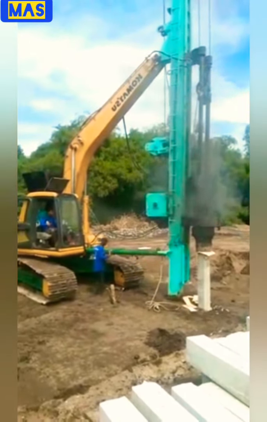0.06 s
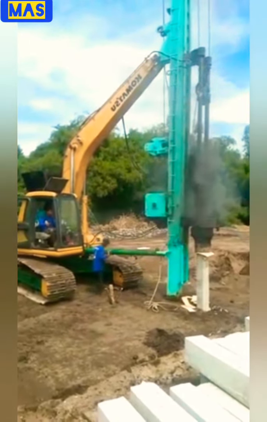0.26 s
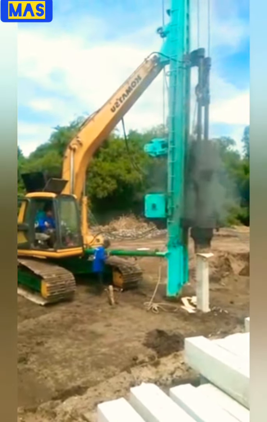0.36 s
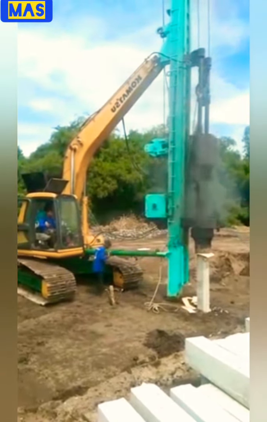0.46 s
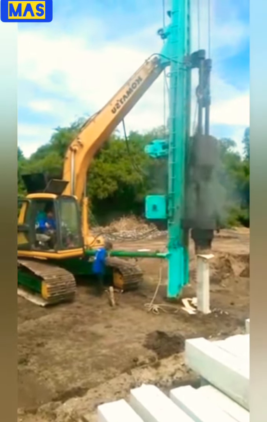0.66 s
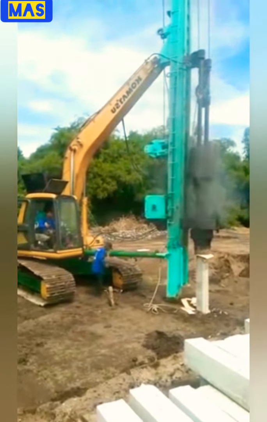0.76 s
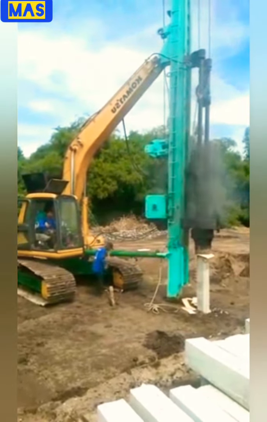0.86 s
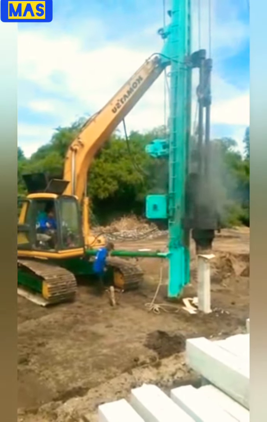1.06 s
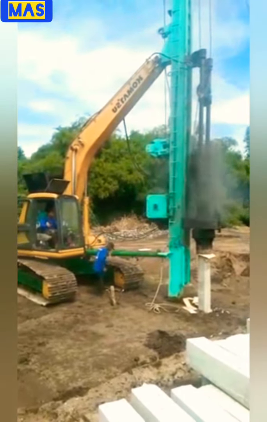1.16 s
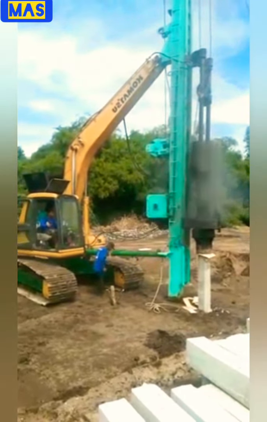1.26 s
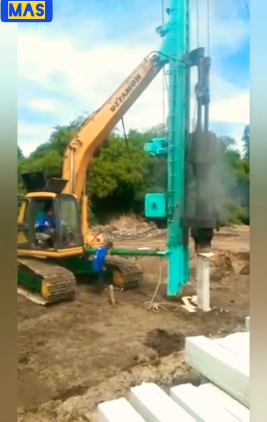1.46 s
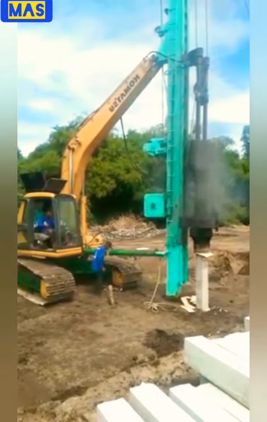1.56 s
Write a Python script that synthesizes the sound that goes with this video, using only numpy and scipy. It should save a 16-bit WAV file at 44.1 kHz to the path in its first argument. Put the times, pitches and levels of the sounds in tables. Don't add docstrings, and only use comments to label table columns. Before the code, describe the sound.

A diesel pile hammer bangs twice, steel clanging, each blow followed by a hissing exhaust boom

```python
import sys
import numpy as np
from scipy import signal
from scipy.fft import rfft, irfft
from scipy.io import wavfile
from scipy.ndimage import uniform_filter1d

SR = 44100
rng = np.random.default_rng(int(sys.argv[2]) if len(sys.argv) > 2 else 0)


def inscribe(sig):
    pcm = np.round(np.clip(np.atleast_2d(sig).T, -1, 1) * 32767)
    wavfile.write(sys.argv[1], SR, pcm.astype(np.int16))


def gain_from_db(level_db):
    decades = np.asarray(level_db, float) / 20
    return 10 ** decades


N = 70560

# start in seconds, level in dB, second tap lag in seconds,
# second tap level in dB.
KNOCK_EVENTS = [
    (0.105, -16.5, 0.018, -13.5),
    (.988, -20.5, 0.014, -14),
]
# frequency in Hz, density in dB per Hz.
KNOCK_SPECTRUM = [(60, -7), (170, 11.5), (600, -3.5), (1600, 5), (2500, 3), (3400, -5.5), (7000, -8.5),
                  (13000, -18)]
# frequency in Hz, level in dB, T60 in seconds.
RAM_RINGS = [(178, -6, .07), (432, -4, .1), (700, -8, .08), (850, -8, .08), (1530, -10, .05),
             (1900, -11, .05)]

# start in seconds, level in dB, trim of the upper rings in dB,
# rise in seconds.
PING_EVENTS = [
    (.2006, -3, 0, .0013),
    (1.0812, -3, -8, .0025),
]
# frequency in Hz, level in dB, T60 in seconds.
ANVIL_RINGS = [(1800, -9, .012), (2400, -11, .08), (4065, 0, .045), (4560, -12, .08), (5100, -13, .04),
               (6100, -13, .035), (7430, -15, .05), (8045, -5, .055), (9950, -22, .05), (12100, -14, .025)]
# frequency in Hz, density in dB per Hz.
CRACK_SPECTRUM = [(300, -17.5), (900, -13.5), (2000, 0.5), (3300, -13.5), (4300, -2.5), (6000, -4),
                  (8100, -7.5), (12000, -8)]
# lag in seconds, level in dB.
PING_ECHOES = [
    (.09, -19),
    (.125, -24),
]
PING_DB = 0.1

# start in seconds, level in dB, treble snap in dB,
# second jolt lag in seconds, jolt level in dB.
BANG_EVENTS = [
    (0.2376, -12.5, 1.5, 0.046, -17),
    (1.1078, -13.5, 9, 0.048, -9),
]
# frequency in Hz, density in dB per Hz.
BANG_SPECTRUM = [(60, -20), (200, -14), (420, -4.5), (570, -22.5), (900, -4), (1300, -15), (2400, -10),
                 (8000, -19.5)]
# frequency in Hz, width in Hz, level in dB.
LEADER_MODES = [(322, 30, -6), (418, 28, -1), (740, 50, -3), (1028, 40, -6), (1405, 45, -8),
                (1955, 50, -11), (2207, 25, 0), (2648, 50, -7), (2812, 25, -6), (4200, 120, -11),
                (4420, 50, -12), (5230, 140, -11), (6410, 45, -10), (7200, 200, -14)]
RING_T60_S, RING_TILT, RING_CLEAN = 0.33, 0.33, 0.55

# start in seconds, hiss level in dB, lag of its return in seconds.
PUFF_EVENTS = [
    (.3515, -4, .0705),
    (1.2248, -5, .0757),
]
# frequency in Hz, density in dB per Hz.
HISS_SPECTRUM = [(150, 9), (300, -1), (1500, -10), (2280, 2), (2950, -13), (4410, -2), (7300, 2),
                 (12000, -2.5)]
# frequency in Hz, level in dB, T60 in seconds.
PORT_RINGS = [(287, -14, .08), (395, -16, .07), (2270, -15, .03)]
# start in seconds, level in dB, lag of its return in seconds.
BOOM_EVENTS = [
    (.3587, -2, .0675),
    (1.2312, -3.5, .074),
]
HISS_DB, BOOM_DB = 0, -1
LEAK_S = .016
BOOM_HZ, BOOM_CLIMB_HZ_PER_S, BOOM_PHASE = 106, 1150, .38
ECHO_HISS_DB, ECHO_BOOM_DB = -21.5, -9.5
LATE_BOOM_S, LATE_BOOM_DB = .152, -21

# start in seconds, level in dB, length in seconds.
TICK_EVENTS = [
    (.763, -41, .006),
    (.456, -36, .012),
    (1.126, -21, .001),
    (1.333, -35, .014),
    (1.443, -45, .004),
]
# start in seconds, level in dB.
THUD_EVENTS = [
    (.643, -23),
    (1.583, -22),
    (1.15, -21),
]
DRAW_DB, DRAW_LAG_S, DRAW_HOLD_S = -49.5, 0.18, 0.11

# frequency in Hz, density in dB per Hz.
WASH_SPECTRUM = [(90, 0.5), (570, -18.5), (950, -17), (1550, -27), (2200, -22.5), (3200, -32), (7600, -31),
                 (14000, -45)]
# frequency in Hz, width in Hz, level in dB.
BLOCK_MODES = [(86, 24, 0), (129.4, 75, -8.5), (391, 32, -9.5), (811, 23, -19), (1940, 100, -38.5)]
ENGINE_DB = -31.5
FIRE_HZ, FIRE_DB, FIRE_ROUGH = 45.87, -4.5, 0.97

# frequency in Hz, T60 in seconds.
SITE_DECAY = [(100, 0.76), (400, 3), (1000, 3.9), (2500, 0.47), (6000, 2.7), (12000, 1.8)]
SITE_DB = -32.5
STROKE_S = 0.79

# frequency in Hz, gain in dB.
MIC_COLOUR = [(20, -20), (45, -2.5), (8150, 1), (8600, -13.5), (10000, -14), (12000, -23.5), (15500, -21.5)]
DUCK_FROM_DB, DUCK_SHARE, RECOVER_DB_PER_S = -14.5, 0.083, 84


def read(points, hz):
    f, value = np.transpose(points)
    return np.interp(np.log(hz + 1), np.log(f + 1), value)


def evened(x):
    return x / np.sqrt(np.mean(x ** 2) + 1e-20)


def colour(x, spectrum):
    gain = gain_from_db(read(spectrum, np.fft.rfftfreq(len(x), 1 / SR)))
    return evened(irfft(rfft(x) * gain, len(x)))


def resonate(x, hz, width):
    return signal.lfilter(*signal.iirpeak(hz, hz / max(width, 1), SR), x)


def shape(s, rise, hold, t60):
    t = np.arange(N) / SR - s
    attack = np.sin(np.pi / 2 * np.clip(t / rise, 0, 1)) ** 2
    return attack * gain_from_db(-60 * np.maximum(t - rise - hold, 0) / t60)


def grit(per_s, spread_db, smooth):
    unevenness = gain_from_db(spread_db * np.minimum(rng.exponential(1, N), 4))
    clicks = (rng.random(N) < per_s / SR) * rng.standard_normal(N) * unevenness
    return evened(clicks) + smooth * rng.standard_normal(N)


def knocks():
    t = np.arange(N) / SR
    noise = colour(grit(3000, 1.1, 0.71), KNOCK_SPECTRUM)
    thin = evened(np.diff(noise, prepend=0) + 0.2 * noise)
    out = 0
    for s, db, lag, second_db in KNOCK_EVENTS:
        first = noise * (shape(s, 0.0084, .004, 0.071) + gain_from_db(-15) * shape(s, 0.0051, 0.016, 0.42))
        second = thin * gain_from_db(second_db) * shape(s + lag, .005, 0.007, 0.053)
        body = 0
        for hz, ring_db, t60 in RAM_RINGS:
            tone = np.sin(2 * np.pi * (hz * t + rng.random()))
            body += gain_from_db(ring_db) * shape(s, 0.002, 0.0026, t60) * tone
        out += gain_from_db(db) * (first + second + body)
    return out


def pings():
    t = np.arange(N) / SR
    noise = colour(rng.standard_normal(N), CRACK_SPECTRUM)
    cracks, rings = 0, 0
    for s, db, upper_db, rise in PING_EVENTS:
        for hz, ring_db, t60 in ANVIL_RINGS:
            wobble = 1 + 0.12 * evened(uniform_filter1d(rng.standard_normal(N), 90))
            tone = np.sin(2 * np.pi * (hz * (t - s) + rng.random())) * wobble
            level_db = db + ring_db + upper_db * (hz > 6500)
            rings += gain_from_db(level_db) * shape(s, rise, 0.0017, t60) * tone
        burst = gain_from_db(-7.5) * shape(s, rise, 0.005, 0.024)
        linger = gain_from_db(-14.5) * shape(s - .002, 0.0013, 0.038, 0.31)
        cracks += gain_from_db(db) * noise * (burst + linger)
    echoes = sum(gain_from_db(db) * np.roll(rings, round(lag * SR)) for lag, db in PING_ECHOES)
    return cracks + rings + echoes


def bang_envelope(rise, hold, t60, snap):
    out = 0
    for s, db, snap_db, lag, jolt_db in BANG_EVENTS:
        blow = shape(s, rise, hold, t60)
        quick = snap * gain_from_db(snap_db) * shape(s, 0.0014, 0.017, 0.061)
        jolt = gain_from_db(jolt_db) * shape(s + lag, 0.012, 0.0071, t60 * 0.45)
        out += gain_from_db(db) * (blow + quick + jolt)
    return out


def leader_ring(hz, width):
    rattle = evened(resonate(grit(900, 2.4, 0.23), hz, width))
    return evened(rattle + RING_CLEAN * np.sin(2 * np.pi * hz * np.arange(N) / SR))


def bangs():
    broad = colour(grit(1800, 1.2, 0.94), BANG_SPECTRUM)
    low = signal.sosfiltfilt(signal.butter(2, 1500, fs=SR, output="sos"), broad)
    high = signal.sosfiltfilt(signal.butter(2, 3600, "high", fs=SR, output="sos"), broad)
    middle = broad - low - high
    rings = 0
    for hz, width, db in LEADER_MODES:
        t60 = RING_T60_S * (1000 / hz) ** RING_TILT
        rings += gain_from_db(db) * leader_ring(hz, width) * bang_envelope(0.0022 + 7.3 / hz, 0.032, t60, 0.49)
    return (gain_from_db(-1.5) * low * bang_envelope(0.0013, 0.035, 0.47, 0.15)
            + gain_from_db(3) * middle * bang_envelope(0.009, 0.033, 0.14, 0.1)
            + gain_from_db(-3.5) * high * bang_envelope(0.004, 0.005, .3, 1.0)
            + gain_from_db(-8) * rings)


def exhaust_hiss():
    t = np.arange(N) / SR
    noise = colour(grit(9000, 0.52, 1.9), HISS_SPECTRUM)
    thin = signal.sosfilt(signal.butter(2, [3200, 9000], "band", fs=SR, output="sos"), noise)
    out = 0
    for s, db, lag in PUFF_EVENTS:
        leak = gain_from_db(-5.5) * shape(s - LEAK_S + 0.0037, LEAK_S, 0.0013, 0.021)
        burst = shape(s, 0.0058, 0.0052, 0.012)
        trail = gain_from_db(-19) * shape(s, 0.0051, 0.016, 0.12)
        echo = (thin + 0.99 * noise) * gain_from_db(ECHO_HISS_DB) * shape(s + lag, 0.0016, 0.0032, 0.046)
        ports = sum(gain_from_db(ring_db) * shape(s - .002, 0.0037, 0.015, t60) * np.sin(2 * np.pi * hz * (t - s))
                    for hz, ring_db, t60 in PORT_RINGS)
        out += gain_from_db(db) * (noise * (leak + burst + trail) + echo + ports)
    return gain_from_db(HISS_DB) * out


def boom(s, rise, hold, t60, climb):
    t = np.maximum(np.arange(N) / SR - s, 0)
    hz = BOOM_HZ + climb * BOOM_CLIMB_HZ_PER_S * .04 * np.tanh(t / .04)
    turns = np.cumsum(hz * (t > 0)) / SR + BOOM_PHASE
    return shape(s, rise, hold, t60) * np.sin(2 * np.pi * turns)


def exhaust_booms():
    out = 0
    for s, db, lag in BOOM_EVENTS:
        first = boom(s, .007, .006, .13, 1.0)
        echo = gain_from_db(ECHO_BOOM_DB) * boom(s + lag, 0.0095, 0.032, 0.12, 0.75)
        late = gain_from_db(LATE_BOOM_DB) * boom(s + LATE_BOOM_S, .02, .025, .12, .7)
        out += gain_from_db(db) * (first + echo + late)
    return gain_from_db(BOOM_DB) * out


def small_parts():
    t = np.arange(N) / SR
    ticks = sum(gain_from_db(db) * shape(s, 0.0012, hold, 0.016) for s, db, hold in TICK_EVENTS)
    draw = sum(gain_from_db(DRAW_DB) * shape(s + DRAW_LAG_S, 0.061, DRAW_HOLD_S, .8) for s, _, _ in PUFF_EVENTS)
    thuds = sum(gain_from_db(db) * shape(s, 0.0077, 0.00067, 0.04) * np.cos(2 * np.pi * 65 * (t - s - .011))
                for s, db in THUD_EVENTS)
    bright = colour(rng.standard_normal(N), HISS_SPECTRUM[2:])
    return (ticks + draw) * bright + thuds


def engine():
    drift = evened(uniform_filter1d(rng.standard_normal(N), 2000))
    turns = np.cumsum(FIRE_HZ * (1 + .05 * drift)) / SR
    fires = np.diff(np.floor(turns), prepend=0) * gain_from_db(4.5 * rng.standard_normal(N))
    drive = evened(fires) + FIRE_ROUGH * rng.standard_normal(N)
    block = sum(gain_from_db(db) * evened(resonate(resonate(drive, hz, width), hz, width))
                for hz, width, db in BLOCK_MODES)
    z = signal.stft(colour(rng.standard_normal(N), WASH_SPECTRUM), nperseg=512)[2]
    patches = uniform_filter1d(rng.standard_normal(z.shape), 8, 0)
    patches = evened(uniform_filter1d(patches, 10, 1))
    wash = signal.istft(z * gain_from_db(1.17 * patches), nperseg=512)[1][:N]
    wash = wash * (1 + 0.14 * np.cos(2 * np.pi * turns))
    return gain_from_db(ENGINE_DB) * (gain_from_db(FIRE_DB + 1) * block + gain_from_db(-3) * wash)


def site(x):
    hz, t, z = signal.stft(rng.standard_normal(SR), SR, nperseg=256)
    decay = gain_from_db(-60 * t / read(SITE_DECAY, hz)[:, None])
    build_up = np.minimum(t / 0.03, 1)
    tail = signal.istft(z * decay * build_up, SR, nperseg=256)[1]
    return signal.fftconvolve(x, tail / np.linalg.norm(tail))


def scene():
    hammer = knocks() + gain_from_db(PING_DB) * pings() + bangs() + exhaust_hiss()
    before = round(STROKE_S * SR)
    tail = site(np.concatenate([hammer[:before], hammer]))[before:before + N]
    mix = hammer + exhaust_booms() + gain_from_db(SITE_DB) * tail + small_parts() + engine()
    return np.tile(mix, (2, 1))


def band_limit(x):
    return signal.sosfilt(signal.butter(12, 16030, fs=SR, output="sos"), x)


def record(dry):
    x = irfft(rfft(dry) * gain_from_db(read(MIC_COLOUR, np.fft.rfftfreq(N, 1 / SR))), N)
    power_db = 10 * np.log10(signal.lfilter([.002], [1, -.998], x[0] ** 2) + 1e-12)
    fall = np.arange(N) * RECOVER_DB_PER_S / SR
    held_db = np.maximum.accumulate(power_db + fall) - fall
    over_db = np.maximum(held_db - DUCK_FROM_DB, 0)
    x = x / gain_from_db(DUCK_SHARE * over_db)
    clipped = x / (1 + abs(x) ** 5) ** (1 / 5)
    return band_limit(clipped)


dry = scene()
out = record(dry)
inscribe(out)
```